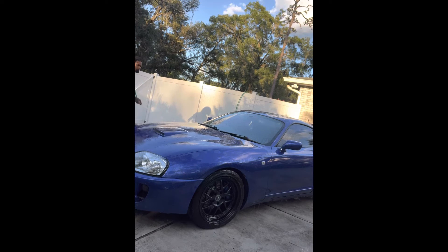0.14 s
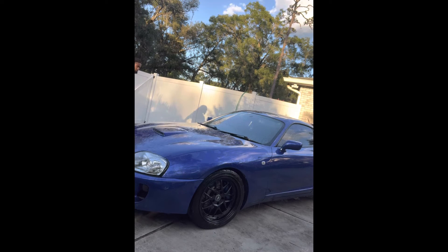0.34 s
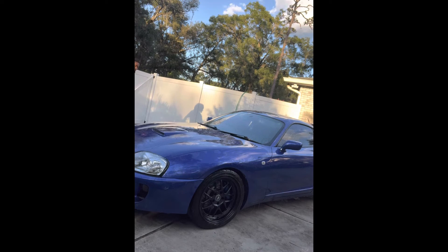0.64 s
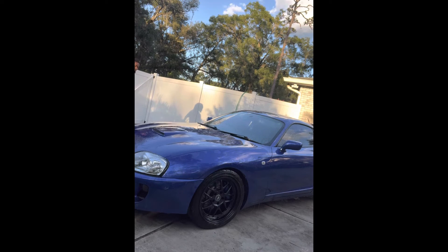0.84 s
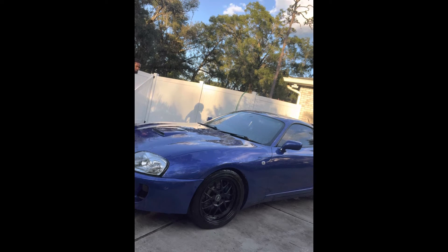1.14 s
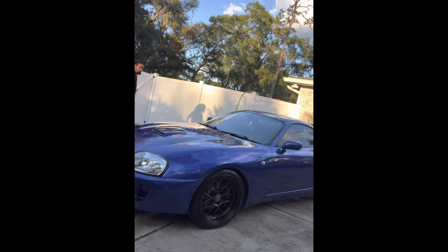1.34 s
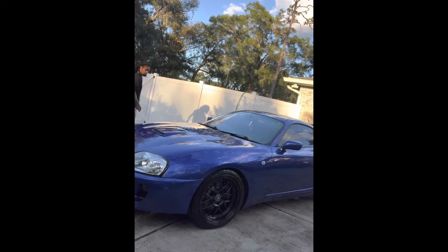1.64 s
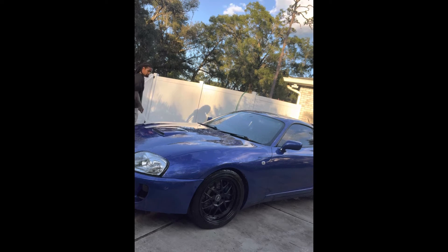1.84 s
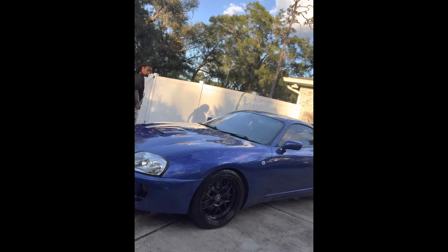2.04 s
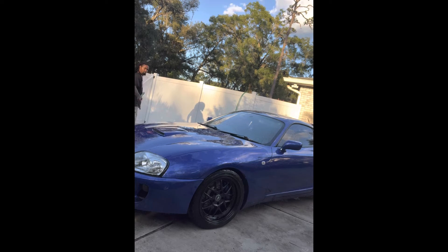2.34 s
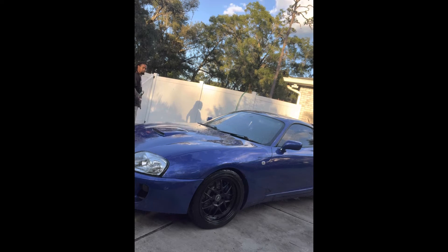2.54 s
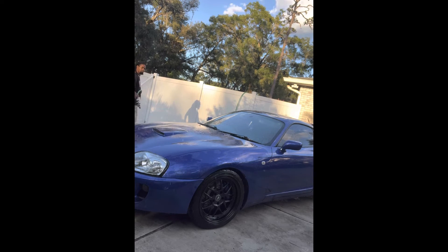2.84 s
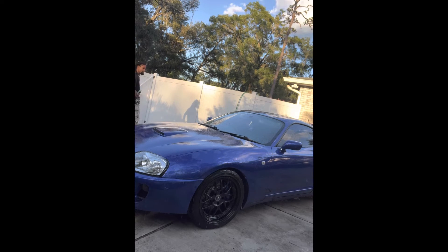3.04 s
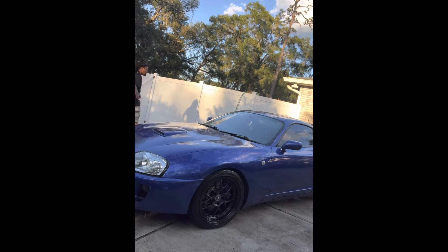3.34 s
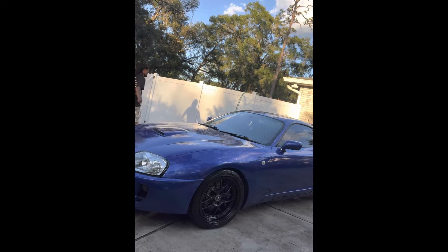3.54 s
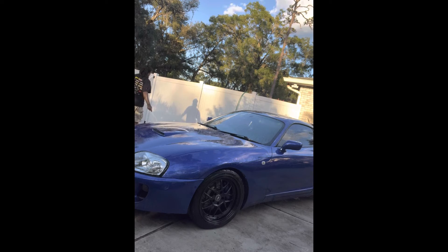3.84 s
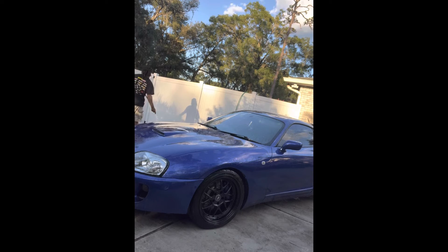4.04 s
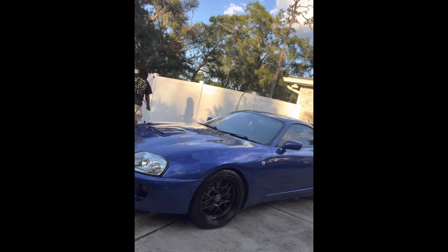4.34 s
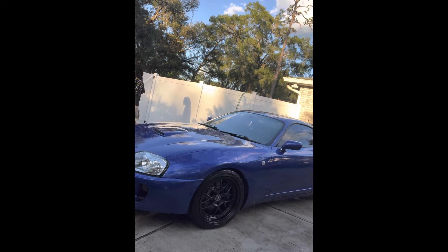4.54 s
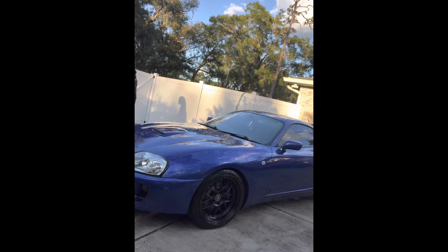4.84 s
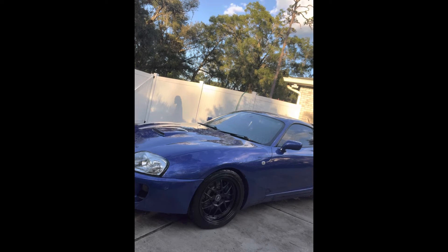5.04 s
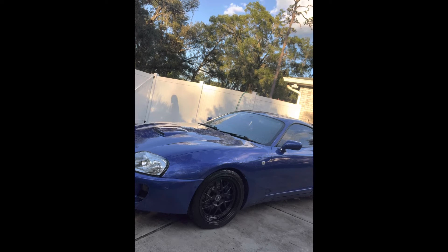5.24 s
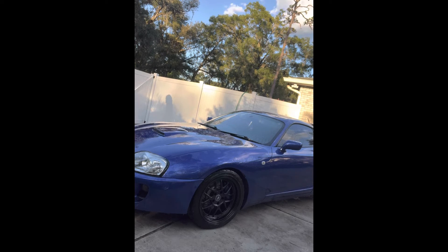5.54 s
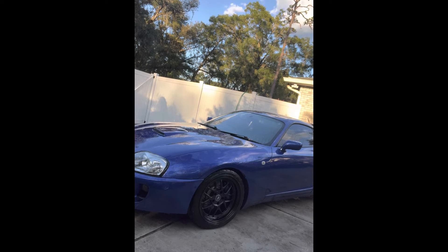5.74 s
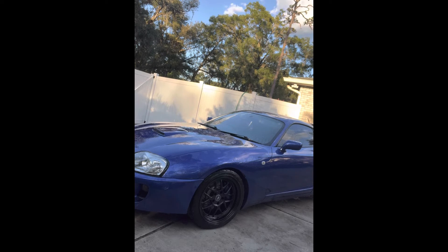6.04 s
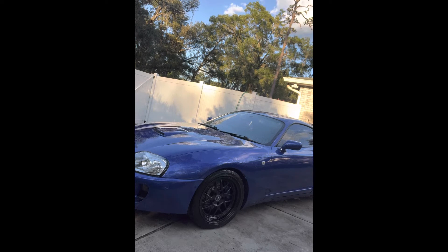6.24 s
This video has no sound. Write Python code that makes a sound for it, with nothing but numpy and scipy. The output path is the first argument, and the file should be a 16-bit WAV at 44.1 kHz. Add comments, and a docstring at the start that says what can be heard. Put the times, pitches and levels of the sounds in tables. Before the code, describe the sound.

Water from a hose hisses over a car and splatters on concrete, with faint distant traffic and a sharp final click.

```python
"""A driveway, heard from the side through two microphone ports a few centimetres apart; far traffic drones.
A garden hose plays over a parked car: the spray hisses and spatters, and run-off smacks on the concrete.
For the first 3.6 s the jet drums on the steel panels whenever it crosses them. From 4.5 s the water falls
nearer the left port. A dry tap sounds at 6.1 s; at 6.3 s the nozzle's trigger snaps, close on the left."""
import sys
import numpy as np
from scipy import signal
from scipy.fft import rfft, irfft, next_fast_len
from scipy.io import wavfile
from scipy.ndimage import uniform_filter1d, map_coordinates

SR = 44100
rng = np.random.default_rng(int(sys.argv[2]) if len(sys.argv) > 2 else 0)


def unload_audio(sound):
    """Save the sound as a 16-bit wav file, at the path given as the first command line argument."""
    columns = np.transpose(np.atleast_2d(sound))
    # keep every value between -1 and 1, then stretch to whole-number steps
    steps = np.round(np.clip(columns, -1, 1) * 32767)
    wavfile.write(sys.argv[1], SR, steps.astype(np.int16))


N = 282240

# The stream from the hose: (time [s], mist level [dB], splash level [dB])
SPRAY_LEVELS = [(0.0, -45, -47.5), (0.25, -54, -54.5), (0.6, -48.5, -50.5), (0.98, -48, -51.5),
                (1.08, -43, -50.5), (1.4, -42.5, -46), (1.8, -47.5, -52), (2.1, -45, -49),
                (2.45, -48.5, -53), (2.68, -68, -50), (2.95, -56, -57), (3.24, -47.5, -61.5),
                (3.34, -51.5, -43), (3.6, -50.5, -53), (3.725, -62, -59.5), (3.85, -59, -46.5),
                (4.2, -67, -50), (4.38, -58, -48.5), (4.48, -58.5, -62), (4.62, -59.5, -63),
                (4.66, -56, -53.5), (5.1, -52, -54.5), (5.6, -54, -60.5), (6.05, -53.5, -54.5),
                (6.23, -64, -58.5), (6.4, -46, -43.5)]
# Water thrown back off an edge: (time [s], rise [s], fall [s], mist level [dB], splash level [dB])
SURGES = [(0.055, 0.1, 0.26, -60, -42), (0.63, 0.013, 0.35, -40, -63), (0.68, 0.071, 0.63, -56, -50.5),
          (1.03, 0.017, 0.071, -37, -66), (1.125, 0.13, 0.08, -59, -44.5), (2.29, 0.5, 0.23, -45, -47.5),
          (2.53, 0.11, 0.17, -41.5, -51), (2.79, 0.27, 0.26, -45.5, -43.5), (3.285, 0.039, 0.068, -60, -42),
          (3.49, 0.035, 0.08, -45, -44.5), (3.752, 0.039, 0.16, -47, -46), (3.8, 0.024, 0.26, -61, -43.5),
          (3.93, .1, 0.68, -54, -48), (5.257, 0.052, 0.049, -39, -41), (5.53, .08, 0.12, -63, -53.5),
          (5.67, 0.059, 0.041, -47, -45.5), (6.13, 0.088, 0.13, -47, -50)]
# Droplet hits within the spray: (time [s], level over the hiss [dB])
SPATTER = [(0, -3.5), (.6, -1.5), (1.2, -11.5), (2.4, -4.5), (3, 0.5), (3.9, -7.5), (4.7, -5), (5, -0.5),
           (6.2, 2.5), (6.4, -11)]
# Spectra of fine mist and of heavier splash: (frequency [Hz], level [dB])
MIST_SPECTRUM = [(3000, -67), (4500, -18.5), (6200, 0), (7600, -2.5), (9000, 2), (10500, -4), (12000, -9.5),
                 (15000, -18.5)]
SPLASH_SPECTRUM = [(600, -29), (1500, -7), (2400, -8), (3200, -4), (4500, -3.5), (6500, 0), (12000, -10.5)]
# The jet crosses a panel: (time [s], rise [s], fall [s], large panels [dB],
# door skin over large panels [dB], boom over large panels [dB], middle panels [dB], patter [dB])
CROSSINGS = [(0.0, .1, 0.067, -41, 2.5, -29.5, -38.5, -54), (0.09, 0.24, 0.26, -45, -9, -7, -45.5, -47.5),
             (0.325, 0.065, 0.094, -43.5, -7, -7, -47, -55),
             (0.355, 0.074, 0.086, -48.5, -6.5, 8.5, -47, -52),
             (1.02, 0.098, 0.093, -52, -9, 4, -53.5, -64), (1.225, 0.11, 0.066, -51, -6.5, -21, -50, -59),
             (2.257, 0.023, 0.15, -44.5, -17, -22, -37.5, -46),
             (2.29, 0.078, 0.12, -54, -20, -15, -55, -37), (2.325, 0.15, 0.13, -53, -17, -17, -41, -57),
             (2.36, 0.073, 0.12, -39.5, -2, -3, -41, -52), (2.41, 0.12, 0.088, -52, -8, -9, -46.5, -62),
             (2.52, 0.12, 0.19, -46.5, -15, -1, -48, -48.5), (2.585, 0.18, 0.11, -48, -19, -16, -47, -61),
             (2.74, 0.11, 0.18, -46.5, -23, 3.5, -48, -53.5),
             (2.795, 0.032, 0.048, -40, 5.5, -20, -39.5, -58), (2.85, 0.14, 0.12, -46.5, -6, -13, -46, -46),
             (3.342, 0.037, 0.12, -43, -13, -17, -44, -51), (3.39, 0.092, 0.15, -48, -7, 0, -48, -60),
             (3.51, 0.13, 0.11, -45.5, -16, 5, -45, -49.5)]
# Water patters on small stiff parts only: (time [s], rise [s], fall [s], level [dB])
TRIM_PATTER = [(0.585, 0.055, 0.024, -48), (2.151, 0.14, 0.25, -53), (3.285, .01, .12, -55),
               (4.36, 0.042, 0.023, -54), (4.915, 0.009, 0.04, -55), (6.135, 0.056, 0.2, -68)]
# Resonances of the steel panels and of the car body: (frequency [Hz], width [Hz], level [dB])
PANEL_MODES = [(171.4, 33, -6), (243, 12.5, 0), (337, 110, -5), (479, 21, -3), (548, 74, 1),
               (710, 570, -5.5), (827, 32, 1.5), (962, 38, 0), (1238, 45, -9), (1416, 38, -5),
               (1730, 490, -20.5)]
BODY_MODES = [(119, 48, -5.5), (190, 34, -0.5)]
# Single heavy slugs of water on the body: (time [s], peak level [dB])
THUMPS = [(.317, -25.5), (0.345, -24), (0.36, -31), (2.394, -42), (2.591, -40), (3.396, -39)]
# The largest drops on the concrete: (time [s], smack peak level [dB], pitch [Hz])
DROPS = [(0.0178, -29, 5200), (0.0487, -25, 6000), (0.0565, -26, 4600), (0.074, -33, 5800),
         (0.1546, -32, 5540), (0.208, -37, 5700), (0.328, -26.5, 7400), (0.6255, -21.5, 6900),
         (0.635, -33, 6490), (0.6523, -26, 6740), (0.6686, -25, 5730), (0.688, -23, 6840),
         (0.706, -26, 7100), (0.724, -28.5, 6340), (0.891, -26, 6850), (1.0275, -21.5, 7060),
         (2.531, -24, 7040), (2.7876, -22.5, 7100), (2.9776, -29, 9100), (3.023, -30, 7800),
         (3.026, -28.5, 7500), (3.065, -37, 6800), (3.082, -41, 6160), (3.0995, -32.5, 6340),
         (3.176, -37, 6600), (3.193, -35, 6700), (3.203, -41, 5500), (3.212, -35, 7600), (3.246, -39, 5400),
         (3.254, -40, 6500), (3.267, -23, 6500), (3.27, -31, 4500), (3.283, -29.5, 1600),
         (3.285, -29, 5600), (3.339, -29, 620), (3.347, -36, 700), (3.479, -30, 6500), (3.4853, -28, 5400),
         (3.534, -28, 6500), (3.575, -35, 5500), (3.862, -36.5, 2300), (3.888, -33, 3300),
         (3.914, -37, 1910), (4.013, -34.5, 3900), (3.79, -22.5, 6000), (4.231, -36, 4000),
         (4.265, -33.5, 2620), (4.357, -35, 4200), (4.389, -34, 6417), (4.631, -35.5, 5770),
         (4.835, -26, 7050), (4.9158, -31, 1770), (4.915, -26.5, 8500), (4.9537, -35.5, 2500),
         (4.9845, -28, 6500), (5.034, -24.5, 6160), (5.091, -22.5, 8300), (5.117, -35, 7700),
         (5.132, -38, 3700), (5.163, -35, 3300), (5.172, -28, 8000), (5.201, -19.5, 6640),
         (5.2214, -28, 6650), (5.238, -22.5, 3830), (5.239, -21, 6960), (5.258, -21.5, 6540),
         (5.3386, -30, 6000), (5.3774, -27, 7200), (5.4233, -37, 6600), (5.448, -39, 5760),
         (5.476, -27.5, 6430), (5.4924, -33, 6940), (5.507, -26, 7100), (5.533, -36.5, 3200),
         (5.5484, -36, 5000), (5.5976, -37, 6550), (5.6282, -26, 8450), (5.651, -22.5, 9150),
         (5.6577, -37.5, 2020), (5.675, -24, 5660), (5.6884, -36, 5500), (5.7399, -32, 9260),
         (5.769, -28, 5140), (5.8177, -29, 6850), (5.852, -30, 4650), (5.872, -31, 6950),
         (5.899, -29, 8140), (5.899, -40, 2700), (5.951, -32.5, 5700), (5.9586, -29, 5370),
         (5.9783, -36, 6040), (6.0123, -37, 8430), (6.0312, -33, 6900), (6.054, -33, 3600),
         (6.0618, -35, 2670), (6.0905, -29, 7500), (6.112, -24, 8850), (6.117, -39, 4500),
         (6.133, -30, 2300), (6.1479, -30, 6470), (6.156, -29, 6430), (6.191, -27.5, 8100),
         (6.277, -31, 7200)]
# The lever's snap and rattles: (time [s], peak level [dB])
TRIGGER_HITS = [(6.3084, -6.5), (6.326, -28), (6.335, -29), (6.351, -33)]
# The lever's resonances: (frequency [Hz], relative level [dB], decay by 60 dB [s])
TRIGGER_MODES = [(2240, -11.5, 0.0096), (3200, 7, 0.0028), (4540, 4.5, 0.0029), (5200, 9.5, 0.0022),
                 (7160, -11, 0.0087), (8900, -12.5, 0.0056), (10330, -6.5, 0.0039), (13850, -24, 0.0023)]
# One far engine's drone climbs, then drops at each gear change: (time [s], pitch [Hz], level [dB])
ENGINE_DRONE = [(0.0, 65, -44.5), (1.2, 72, -49), (1.45, 62, -51.5), (2.5, 72, -54), (2.8, 61, -49),
                (3.4, 65.5, -44), (4.75, 70, -55), (5.2, 73, -48), (5.4, 62, -55), (6.4, 66, -48)]
# The far engine's overtone, about an octave above its drone: (time [s], pitch [Hz], level [dB])
ENGINE_OVERTONE = [(.45, 113.3, -60), (1.25, 122.2, -55.5), (2.3, 144.4, -55.5)]
# Spectrum of the street's wash: (frequency [Hz], level [dB])
STREET_SPECTRUM = [(15, -68), (25, -23), (71, -3), (178, -15), (229, -16.5), (262, -20), (364, -22),
                   (662, -25), (787, -26), (2500, -36.5), (3250, -65), (5500, -120)]
# Reflections off fence and house wall: (frequency [Hz], decay by 60 dB [s])
YARD_DECAY = [(300, 0.11), (2500, 0.3), (6000, 0.08), (14000, 0.037)]
# Stereo width: how alike left and right sound, nearly mono at 4.6-6 kHz: (frequency [Hz], likeness [0..1])
STEREO_LIKENESS = [(30, .99995), (110, .9995), (200, .99), (380, .92), (700, .8), (1400, .76), (2500, .55),
                   (3600, .85), (4600, .97), (6000, .985), (6800, .88), (8500, .78), (11000, .88),
                   (11900, .9999)]
# Phase between the ports: (frequency [Hz], lead of the left port [rad])
PORT_LEAD = [(1000, 0), (6000, .1), (7000, .75), (10200, 2), (11000, 2.7), (11900, np.pi)]

TIME = np.arange(N) / SR


def spray():
    """At the car, fine mist hisses and heavier water splashes lower; both carry droplet hits."""
    mist_db, splash_db = curves(SPRAY_LEVELS)
    surge_mist_db, surge_splash_db = np.transpose(SURGES)[3:]
    hit_gain = amp(curves(SPATTER)[0])
    hits = hit_gain * impacts(count=4500, spread_db=4.0, burst_ms=1.0, patchy_db=4)
    flutter = wobble(rate_hz=30)

    def layer(spectrum, level_db, surge_db, patchy_db, flutter_db):
        water = (patchy(patchy_db) + hits) / np.hypot(1, hit_gain)
        gain = np.hypot(amp(level_db), swells(SURGES, surge_db)) * amp(flutter_db * flutter)
        return gain * unit(spread(water, lambda hz: amp(along(spectrum, hz))))

    mist = layer(MIST_SPECTRUM, mist_db, surge_mist_db, patchy_db=1.5, flutter_db=0.24)
    splash = layer(SPLASH_SPECTRUM, splash_db, surge_splash_db, patchy_db=2.0, flutter_db=1.06)
    return mist + splash


def drumming():
    """Slugs of water from the jet beat the sheet steel at one spot, which rings at its own resonances."""
    large_db, skin_db, boom_db, middle_db, patter_db = np.transpose(CROSSINGS)[3:]
    slugs = impacts(count=9000, spread_db=-6.5, burst_ms=15.0, patchy_db=0.5)

    def ring(modes, width=0.38):
        return unit(spread(slugs, resonances(modes), width))

    large = swells(CROSSINGS, large_db, crest=.2) * ring(PANEL_MODES[:4])
    middle = swells(CROSSINGS, middle_db, crest=.2) * ring(PANEL_MODES[4:8])
    boom = swells(CROSSINGS, large_db + boom_db) * ring(BODY_MODES)
    door_mode = hum(hz=398.4, rate_hz=25, steady=2.2)  # the door's lowest mode, barely damped
    skin = swells(CROSSINGS, large_db + skin_db, crest=.2) * door_mode
    trim_gain = swells(TRIM_PATTER, np.transpose(TRIM_PATTER)[3])
    passing_gain = np.hypot(swells(CROSSINGS, patter_db), trim_gain)
    steady_gain = amp(curves(SPRAY_LEVELS)[1] - 20)  # 20 dB under the splash
    patter = np.hypot(passing_gain, steady_gain) * ring(PANEL_MODES[7:], width=1)
    return large + middle + boom + skin + patter


def thumps(t60_s=0.028, rise_s=0.0033):
    """Heavy slugs boom in the car body, one or two low swings each."""
    out, t = np.zeros(N), np.arange(SR // 10) / SR
    envelope = amp(-60 * t / t60_s) * (1 - np.exp(-t / rise_s))
    for start, db in THUMPS:
        hz = rng.uniform(95, 120)
        swing = envelope * np.sin(2 * np.pi * hz * t)
        out[round(start * SR):][:len(t)] -= amp(db) * unit_peak(swing)
    return out


def drops(rise_s=.0002, fizz_hz=6500, fizz_t60_s=0.056, fizz_db=-15.5):
    """Each large drop smacks the concrete in a band set by its size, then breaks into a short fizz."""
    out, t = np.zeros(N + SR), np.arange(3000) / SR
    fizz_band = signal.iirpeak(fizz_hz, .9, SR)
    for start, db, hz in DROPS:
        band = signal.iirpeak(hz, 1.1 + hz / 12000, SR)  # big drops land with a broad dull knock
        envelope = np.exp(-t * (hz + 5000) / 8) * (1 - np.exp(-t / rise_s))
        burst = rng.standard_normal(len(t)) * envelope
        burst[8] += 3  # the first contact is one sharp tick
        bright_edge = 0.045 * min(hz / 5000, 1) * np.gradient(burst)
        smack = signal.lfilter(*band, signal.lfilter(*band, burst)) + bright_edge
        fizz = signal.lfilter(*fizz_band, rng.standard_normal(len(t)) * amp(-60 * t / fizz_t60_s))
        out[round(start * SR):][:len(t)] += amp(db) * (unit_peak(smack) + amp(fizz_db) * fizz)
    return out[:N]


def trigger(rise_s=0.0009, spring_at_s=6.3235, spring_db=-32):
    """Close by, the nozzle's lever snaps against its stop and rattles; its spring sings briefly."""
    out, t = np.zeros(N + SR), np.arange(2000) / SR
    low_cut = signal.butter(4, 1800, 'high', fs=SR, output='sos')  # too small to radiate bass
    for start, db in TRIGGER_HITS:
        scatter_db = rng.normal(0, 1.5, len(TRIGGER_MODES))
        ring = sum(amp(mode_db + offset_db - 60 * t / t60) * np.sin(2 * np.pi * hz * t)
                   for (hz, mode_db, t60), offset_db in zip(TRIGGER_MODES, scatter_db))
        click = signal.sosfilt(low_cut, ring * (1 - np.exp(-t / rise_s)))
        out[round(start * SR):][:len(t)] += amp(db) * unit_peak(click)
    spring_envelope = np.exp(-((TIME - spring_at_s) / .006) ** 4)  # about 12 ms long
    return out[:N] + amp(spring_db) * spring_envelope * hum(hz=4650, rate_hz=150, steady=2.2)


def tap(at_s=6.0888, db=-27.5, from_hz=3440, to_hz=377, slide_s=0.00102, rise_s=0.00087, t60_s=0.01):
    """One dry tap slides down in pitch onto a hollow low note."""
    t = np.clip(TIME - at_s, 0, None)
    hz = to_hz + (from_hz - to_hz) * np.exp(-t / slide_s)
    phase = 2 * np.pi * np.cumsum(hz * (t > 0)) / SR
    envelope = (1 - np.exp(-(t / rise_s) ** 2)) * amp(-60 * t / t60_s)
    return amp(db) * unit_peak(envelope * np.sin(phase))


def yard(x, delay_samples=90):
    """Fence and house wall answer, thin in the bass; each frequency dies at its own speed."""
    band_hz, t, noise = signal.stft(rng.standard_normal((2, SR // 2)), SR, nperseg=256)
    decay = amp(-60 * t / along(YARD_DECAY, band_hz)[:, None])
    tail = signal.istft(noise * decay, SR, nperseg=256)[1]
    delayed = np.pad(x, (delay_samples, 0))[None]
    reflections = signal.fftconvolve(delayed, tail / np.linalg.norm(tail[0]), axes=1)[:, :N]
    return spread(reflections, lambda hz: 1j * hz / (1200 + 1j * hz) / (1 + 1j * hz / 6000))


def traffic(overtone_fade_s=0.15, wash_db=-48, waver_db=.3):
    """Far off, one engine's low note wavers up through the gears, with its overtone and the street's wash."""
    drone_hz, drone_db = curves(ENGINE_DRONE)
    drone = amp(drone_db) * hum(drone_hz, rate_hz=20, steady=1.8)
    overtone_hz, overtone_db = curves(ENGINE_OVERTONE)
    start, end = ENGINE_OVERTONE[0][0], ENGINE_OVERTONE[-1][0]
    fade = np.clip(np.minimum(TIME - start, end - TIME) / overtone_fade_s, 0, 1)
    overtone = fade * amp(overtone_db) * hum(overtone_hz, rate_hz=5.36, steady=6.8)
    wash = unit(spread(patchy(patchy_db=0.9), lambda hz: amp(along(STREET_SPECTRUM, hz))))
    return drone + overtone + amp(wash_db + waver_db * wobble(rate_hz=2.07)) * wash


def spread(pair, response, width=1):
    """A wide source: the second stream is what differs between left and right."""
    def mid_and_side(hz):
        angle = width * np.arccos(along(STEREO_LIKENESS, hz)) / 2
        return response(hz) * [np.cos(angle), np.sin(angle)]

    mid, side = filtered(pair, mid_and_side)
    return np.array([mid + side, mid - side])


def leftward(x, shade_db, lead_rad):
    """A source on the left: the left port leads, and the microphone's housing shades the right one."""
    def ports(hz):
        shade = np.exp(-np.log((hz + 1) / 3800) ** 2 / .3)
        mid_lead = np.exp(-(np.log((hz + 1) / 2400) / .95) ** 4)
        top_lead = .35 * (hz / 14000) ** 4
        left = amp(shade_db * shade / 2) * np.exp(.5j * lead_rad * (mid_lead + top_lead))
        return np.array([left, 1 / left])

    return filtered(x, ports)


def impacts(count, spread_db, burst_ms, patchy_db):
    """Random droplet hits: noise bursts of varied size and colour, two streams with the same timing."""
    size_db = spread_db * np.minimum(rng.exponential(1, count), 2.2)  # drop sizes are bounded
    strikes = np.bincount(rng.integers(0, N, count), amp(size_db), N)
    fade = np.exp(-np.arange(400) / (burst_ms * SR / 1000))
    return unit(signal.fftconvolve(strikes, fade)[:N] * patchy(patchy_db))


def patchy(patchy_db):
    """Two white noises sharing patches of random gain in time and frequency."""
    noise = signal.stft(rng.standard_normal((2, N)), nperseg=512)[2]
    patches = uniform_filter1d(uniform_filter1d(rng.standard_normal(noise.shape[1:]), 8, 0), 8, 1)
    return unit(signal.istft(noise * amp(patchy_db * unit(patches)), nperseg=512)[1][:, :N])


def swells(rows, peak_db, crest=0):
    """Gain of events that slope by about 20 dB per rise or fall time; crest rounds their tops."""
    t = TIME[::32]
    peak_s, rise_s, fall_s = np.transpose(rows)[:3, :, None]
    from_peak = np.maximum((peak_s - t) / rise_s, (t - peak_s) / fall_s)
    rounded = np.hypot(from_peak, crest) - crest
    power = np.sum(amp(peak_db[:, None] - 20 * rounded) ** 2, axis=0)
    return np.interp(TIME, t, np.sqrt(power))


def resonances(modes):
    """Causal frequency response of damped modes, added with alternating sign."""
    return lambda hz: sum((-1) ** k * amp(db) * 1j * hz * width / (centre**2 - hz**2 + 1j * hz * width)
                          for k, (centre, width, db) in enumerate(modes))


def hum(hz, rate_hz, steady):
    """A tone of rms 1 that wavers in level and phase around a steady part."""
    waver = wobble(rate_hz) + 1j * wobble(rate_hz) + steady
    phase = 2 * np.pi * np.cumsum(hz * np.ones(N)) / SR
    return unit((waver * np.exp(1j * phase)).real)


def wobble(rate_hz):
    """A smooth random curve with rate_hz knots a second."""
    return map_coordinates(rng.standard_normal(int(N * rate_hz / SR) + 4), [TIME * rate_hz])


def filtered(x, response):
    """x through a complex frequency response."""
    size = next_fast_len(N + SR // 2)
    return irfft(rfft(x, size) * response(np.fft.rfftfreq(size, 1 / SR)), size)[..., :N]


def curves(rows):
    """One value per sample for each column after the time."""
    times, *columns = np.transpose(rows)
    return [np.interp(TIME, times, column) for column in columns]


def along(points, hz):
    """Interpolate (frequency [Hz], value) points on a log axis."""
    point_hz, values = np.transpose(points)
    return np.interp(np.log(hz + 1), np.log(point_hz + 1), values)


def amp(db):
    """Decibels to gain."""
    return 10 ** (np.asarray(db) / 20)


def unit(x):
    """Scaled to rms 1."""
    return x / np.sqrt(np.mean(x ** 2) + 1e-20)


def unit_peak(x):
    """Scaled to peak 1."""
    return x / np.abs(x).max()


def scene():
    """The driveway from the microphone: water and nozzle near, yard around, traffic far behind."""
    snap, drips, knock, water = trigger(), drops(), tap(), spray()
    to_left = np.clip((TIME - 4.5) / .3, 0, 1)  # from 4.5 s the water falls nearer the left port
    near = (drips + water) * (1 - to_left)
    near += leftward(water * to_left, shade_db=2.5, lead_rad=.45)
    near += leftward(drips * to_left + knock, shade_db=5.5, lead_rad=.8)
    near += leftward(snap, shade_db=7.5, lead_rad=1.05)
    reflections = amp(-11) * yard(snap) + amp(-6) * yard(drips + amp(-4) * knock)
    return near + reflections + thumps() + drumming() + traffic()


def record(dry):
    """The spaced ports drift out of phase towards the treble; nothing above 16 kHz is kept."""
    return filtered(dry, lambda hz: np.exp(.5j * along(PORT_LEAD, hz) * [[1], [-1]]) * (hz < 16000))


dry = scene()
out = record(dry)
unload_audio(out)
```